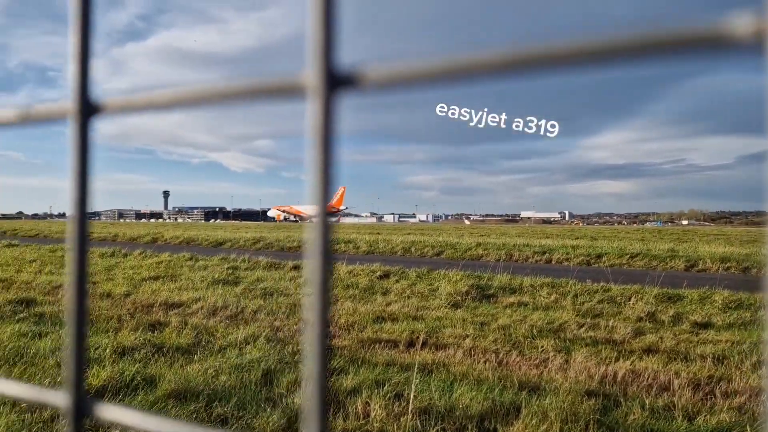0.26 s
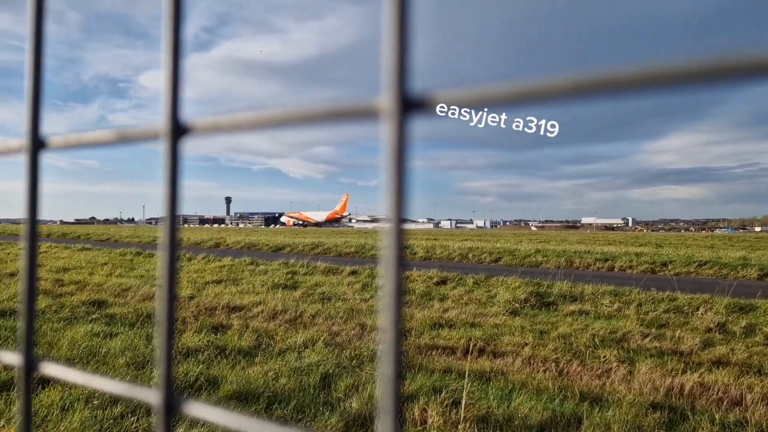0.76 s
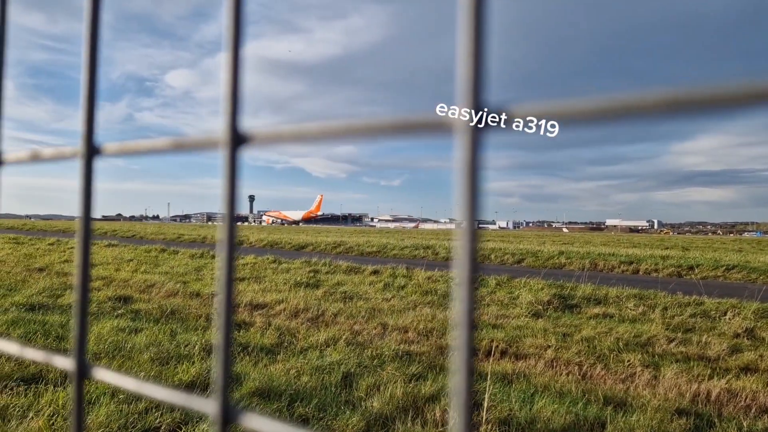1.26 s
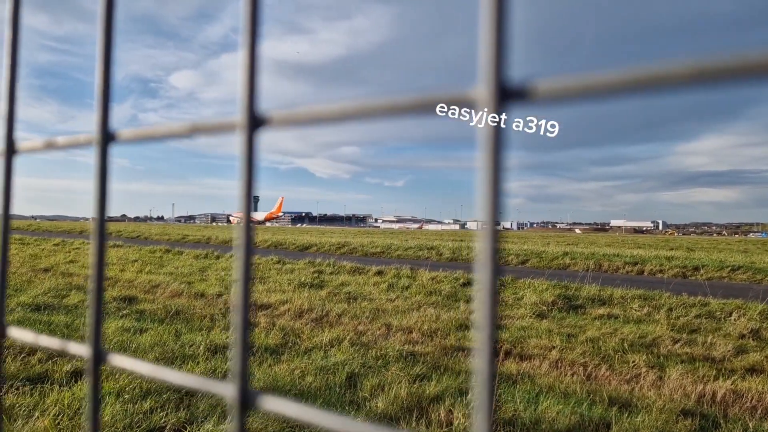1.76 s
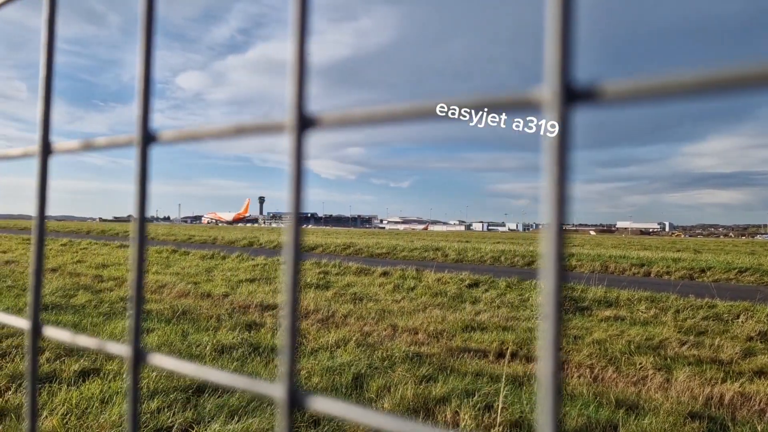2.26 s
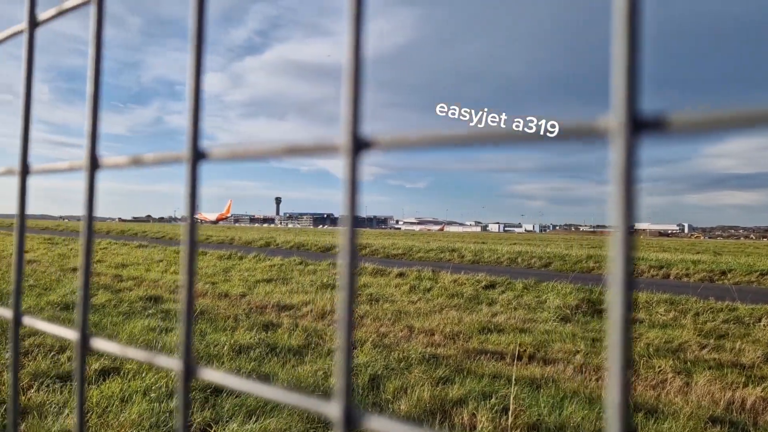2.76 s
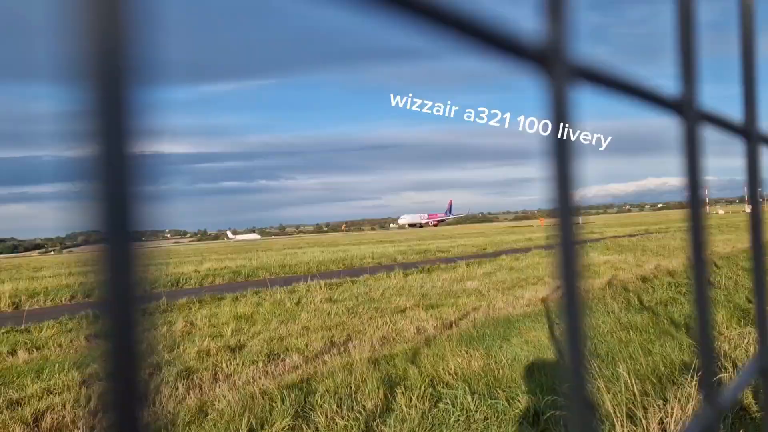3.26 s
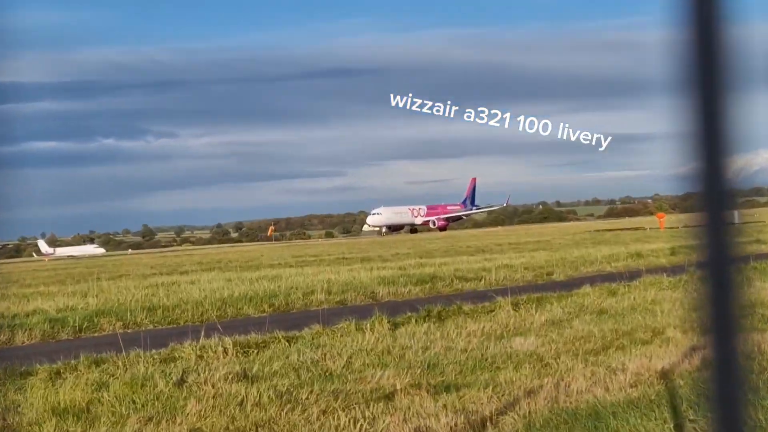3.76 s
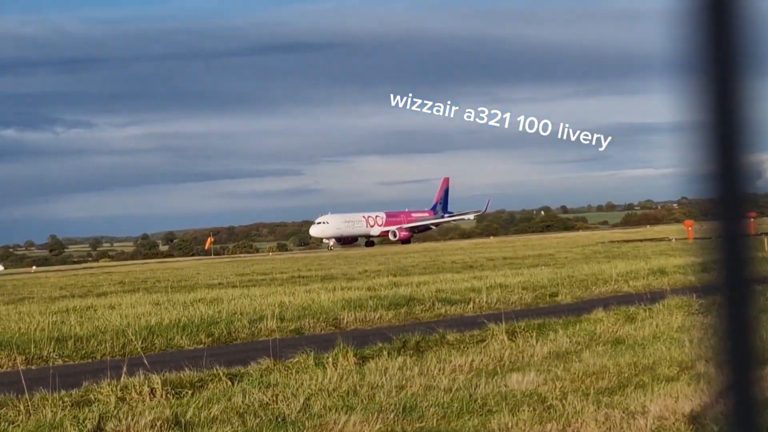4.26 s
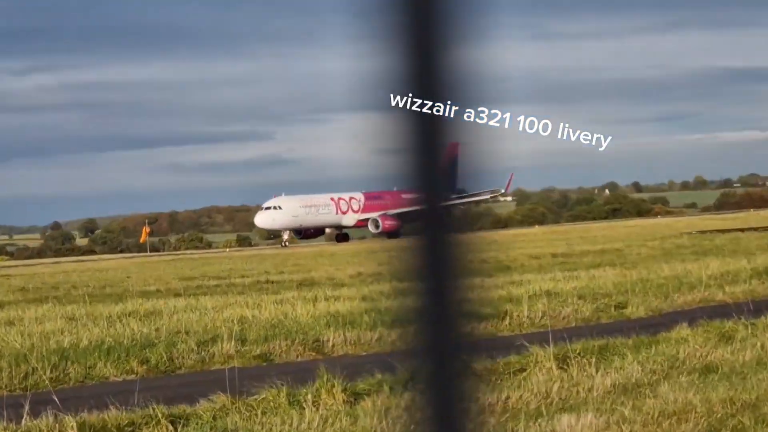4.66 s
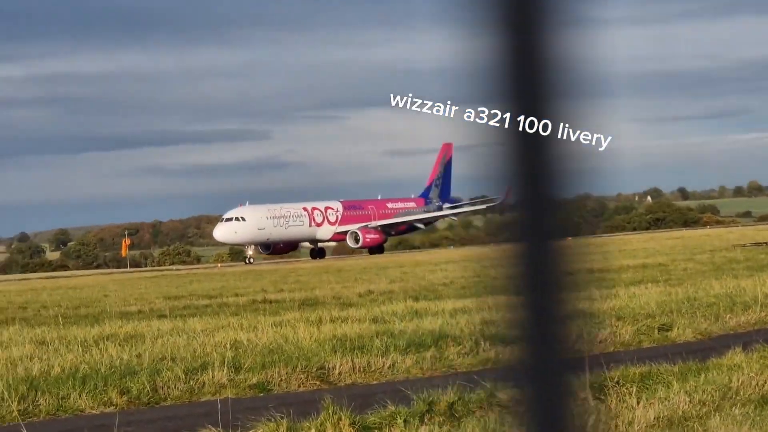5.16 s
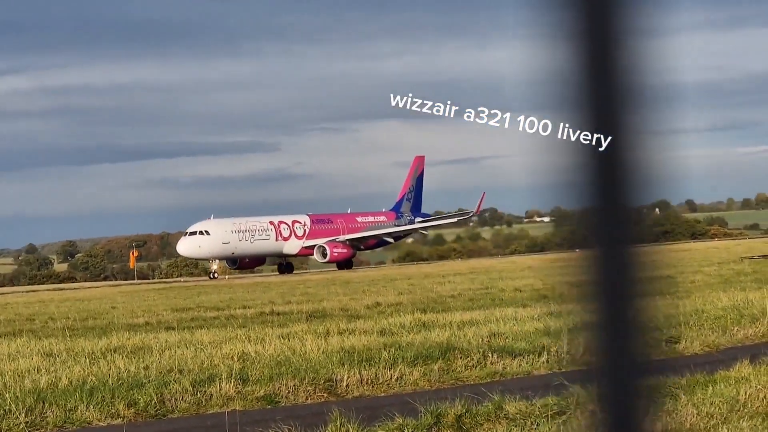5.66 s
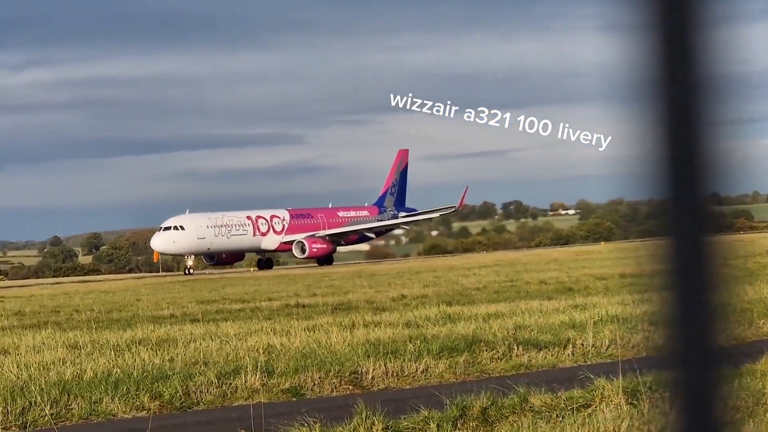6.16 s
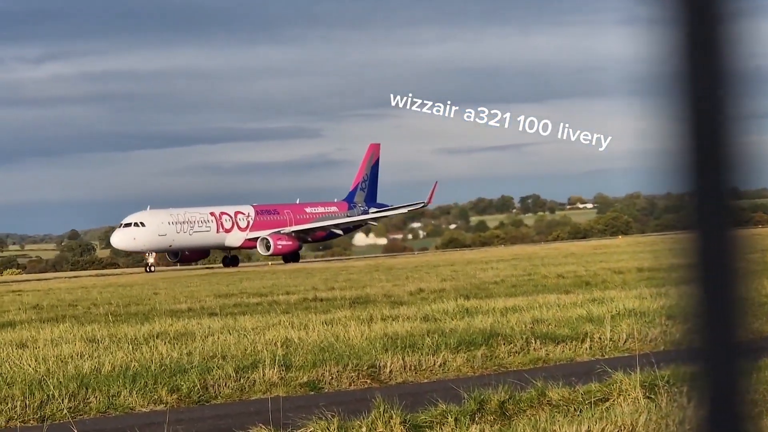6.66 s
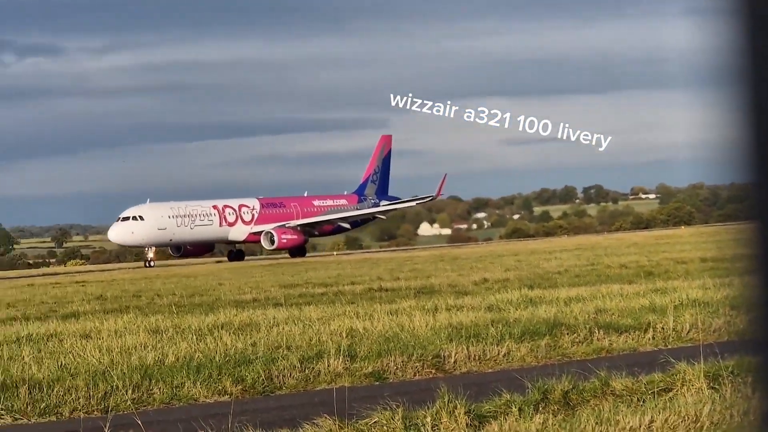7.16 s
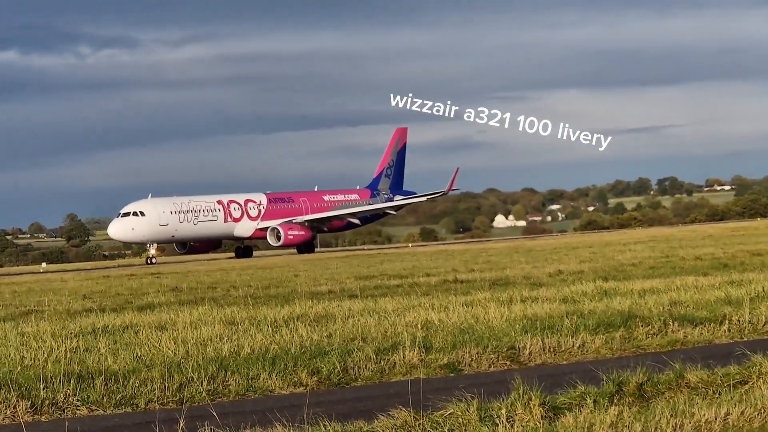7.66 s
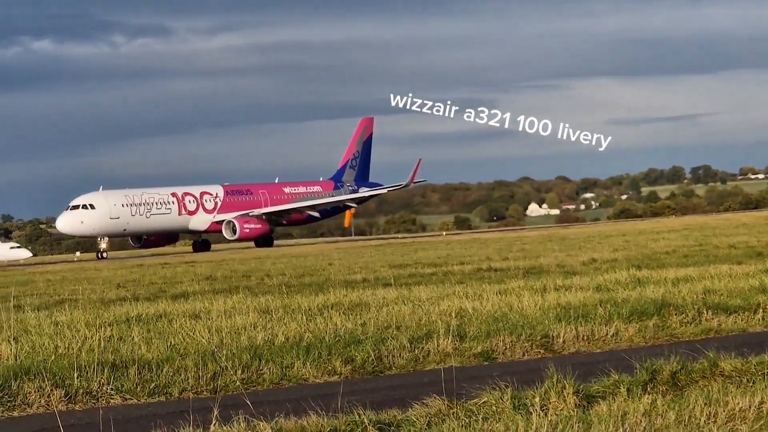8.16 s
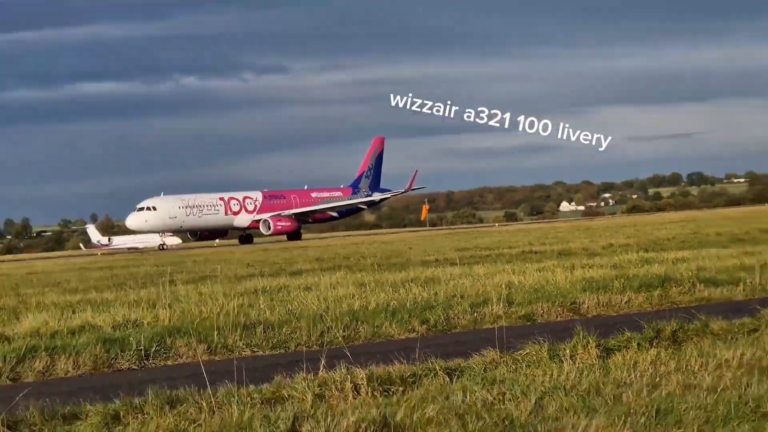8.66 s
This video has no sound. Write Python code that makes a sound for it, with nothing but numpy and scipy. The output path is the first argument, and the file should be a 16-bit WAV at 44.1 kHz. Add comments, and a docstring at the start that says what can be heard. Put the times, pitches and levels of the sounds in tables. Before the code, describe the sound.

Outdoors beside a runway, a distant airliner gives a deep rumble with a soft rushing roar and a faint high whine, dulling as it draws away. After a split second of silence, a nearer airliner takes over, much louder, with heavy rumble, a slightly hollow roar and a wavering whine that creeps up in pitch. One sharp click sounds close to the handheld phone microphone.

```python
"""Two airliners on a runway.

A distant airliner draws away; after a brief silence the scene changes, and a nearer one spools up and drives
the limiter of a handheld phone with two microphone ports. Large exhaust eddies give a deep rumble, turbulent
mixing a broad roar that flickers in the moving air, and the fan blades wavering tones. The hand cupped round
the phone colours the roar, and a few small ticks sound close by."""
import sys
import numpy as np
from scipy import signal
from scipy.fft import rfft, irfft, next_fast_len
from scipy.io import wavfile
from scipy.ndimage import uniform_filter1d, minimum_filter1d, map_coordinates

SR = 44100
rng = np.random.default_rng(int(sys.argv[2]) if len(sys.argv) > 2 else 0)


def put_to_file(sound):
    """Save the sound as 16-bit audio at rate SR, in the file named by the first command-line argument."""
    columns = np.atleast_2d(sound).T  # one column per channel
    safe = np.clip(columns, -1, 1)
    whole_steps = np.round(safe * 32767)
    wavfile.write(sys.argv[1], SR, whole_steps.astype(np.int16))


N = 392049
GAP_START_S, GAP_END_S = 3.2982, 3.3315   # silence where the scene changes from the far airliner to the near one

# Levels of the exhaust. Each row: time in seconds, then low rumble, upper rumble, roar and the roar's
# treble lift, all in dB.
NEAR_LEVELS = [(3.33, -8, -29.5, -28.5, 0.16), (3.7, -9.5, -24, -25.5, 0), (4.6, -4.5, -25, -26, 0.42),
               (5.5, -6, -21.5, -25, -1.5), (6.2, -5.5, -21, -25, -1.3), (6.6, -4.5, -26, -28, 0.17),
               (7.6, -7, -22, -26.5, -0.42), (8.75, -6.5, -26.5, -27.5, 0.13), (8.84, -16.5, -26, -31.5, 0),
               (8.89, -14, -20.5, -28.5, 0)]
# Rumble spectrum. Each row: frequency in Hz, relative density in dB.
NEAR_RUMBLE_SPECTRUM = [(12, -48), (20, -30.5), (59, -1.5), (92, 0), (147, -1), (217, -9.5), (390, -37),
                        (450, -46), (580, -65.5), (990, -120)]
# Roar spectra, left port then right. Each row: frequency in Hz, relative density in dB.
NEAR_ROAR_SPECTRA = [(430, -3), (780, -1.7), (860, -6.5), (1080, 1), (1340, -2.5), (1640, -1.5),
                     (2710, -10), (2970, -4), (5510, -13.5), (5640, -17), (7020, -25.5), (7880, -25),
                     (8660, -53.5), (8790, -52.5)], [(430, -6.5), (600, -6.5), (780, 2.5), (1080, -4.5),
                     (1290, -1), (1420, 2), (1590, 2.5), (3490, -6), (5510, -11.5), (5940, -23),
                     (6240, -15.5), (6930, -21), (7490, -21), (8790, -58.5)]
# Path difference round the phone. Each row: frequency in Hz, phase lead of the left port in radians.
NEAR_PHASE = [(0, 0), (690, 0.3), (950, 1.5), (1210, 0.9), (1550, 2.7), (1890, 1.9), (2840, 9.4),
              (4130, 12.6), (5080, 19.0), (5860, 20.3), (6120, 19.5), (7060, 25.1), (7580, 26.1),
              (8010, 30.4)]
# Likeness of the roar at the two ports. Each row: frequency in Hz, coherence from 0 to 1.
NEAR_COHERENCE = [(300, .95), (500, .8), (750, .92), (1300, .84), (1700, .6), (2400, .66), (3400, .84),
                  (5000, .72), (6000, .5), (8000, .35)]
# Peaks and dips of the cupped hand, left port then right. Each row: centre in Hz, width in Hz, gain in dB.
NEAR_HAND_MODES = ([(805, 79, 5.5), (1170, 74, 4), (2230, 230, 5.5), (3680, 280, -1.5), (4340, 300, -0.5),
                   (7500, 300, -1.5)], [(800, 110, 1.5), (1340, 320, 5.5), (1590, 130, -13),
                   (2000, 230, -1), (2420, 170, -3.5), (3410, 200, 6), (4450, 250, 0.5), (4860, 220, 4.5),
                   (6440, 250, 3.5), (7640, 250, 3)])
# Blade tones of the two engines, fading in the air. Each row: time in seconds, rms level in dB.
FIRST_FAN_LEVELS = [(3.33, -33), (3.56, -33), (3.6, -28), (3.75, -26), (3.81, -40), (3.92, -30),
                    (4.04, -38), (4.13, -28), (4.3, -29), (4.43, -35), (4.54, -26), (4.66, -42),
                    (5.12, -29), (5.45, -44), (6.08, -33), (6.7, -45), (7.08, -35), (7.25, -44), (7.6, -36),
                    (7.8, -41), (8.15, -35), (8.5, -44), (8.89, -47)]
SECOND_FAN_LEVELS = [(3.33, -43), (3.65, -37), (3.9, -46), (4.25, -38), (4.6, -49), (5.35, -46),
                     (5.48, -29.5), (5.62, -33.5), (5.8, -48.5), (7.3, -44.5), (8.89, -49)]
def near_airliner(t):
    """Spool-up: two engines, a little apart in pitch, approach full speed exponentially."""
    full_speed_hz, rise_hz, spool_s, second_speed_ratio = 1968, 120, 1.8, 0.954
    fan_hz = full_speed_hz - rise_hz * np.exp(-(t - GAP_END_S) / spool_s)
    low_db, upper_db, roar_db, treble_db = in_time(NEAR_LEVELS, t)
    jet = roar(t, NEAR_ROAR_SPECTRA, roar_db, treble_db, NEAR_COHERENCE, NEAR_PHASE,
               gust_db=-0.14, patch_db=0.77, low_hz=330, high_hz=8500)
    return (rumble(t, NEAR_RUMBLE_SPECTRUM, low_db, upper_db, lead_rad=0.31, pan_db=-1, split_hz=218.8)
            + howl(t, cupped_hand(t, jet, NEAR_HAND_MODES))
            + fan(t, fan_hz, FIRST_FAN_LEVELS, lead_rad=1.9, pan_db=-1.5, scatter=0.35, spread_hz=22)
            + fan(t, second_speed_ratio * fan_hz, SECOND_FAN_LEVELS,
                  lead_rad=1.8, pan_db=5.5, scatter=0.94, spread_hz=50))


# Levels of the exhaust. Each row: time in seconds, then low rumble, upper rumble, roar and the roar's
# treble lift, all in dB.
FAR_LEVELS = [(0, -15, -26.5, -38.5, 0.5), (1, -16, -29, -38.5, -0.5), (1.8, -16.5, -35.5, -38.5, -0.5),
              (2.3, -16, -45, -41, -3), (2.7, -16, -44.5, -40, 0.5), (3.3, -15.5, -49, -42.5, -0.5)]
# Spectra of rumble and roar (left port, then right). Each row: frequency in Hz, relative density in dB.
FAR_RUMBLE_SPECTRUM = [(12, -37.5), (20, -23), (49, 0), (103, 2), (145, -3.5), (201, -5.5), (274, -19),
                       (351, -32.5), (450, -45.5), (580, -73.5), (990, -120)]
FAR_ROAR_SPECTRA = [(430, -7), (470, -8.5), (730, -0.8), (950, -6), (1510, -2.1), (1680, -4.5), (2150, -2),
                    (4870, -23), (5600, -12.5), (7670, -19.5), (8010, -22), (9390, -24.5), (10340, -34.5),
                    (10380, -33)], [(430, -5.5), (470, -10.5), (730, -1), (990, -8), (1420, -5), (1720, -7),
                    (3960, -12), (4690, -9.5), (6240, -13.5), (7280, -13), (7880, -17), (8440, -30),
                    (10290, -48), (10380, -50)]
# Path difference round the phone. Each row: frequency in Hz, phase lead of the left port in radians.
FAR_PHASE = [(0, 0), (1810, 0.9), (2840, -0.1), (3190, 0.4), (3620, -0.0), (3880, 0.9), (4130, 0.5),
             (4820, 2.6), (5250, 2.3), (6120, 2.6), (6370, 2.2), (6800, 2.7), (7490, 4.3), (8010, 4.6)]
# Likeness of the roar at the two ports. Each row: frequency in Hz, coherence from 0 to 1.
FAR_COHERENCE = [(300, .95), (500, .84), (750, .92), (1500, .8), (2500, .8), (4000, .62), (6000, .5),
                 (9000, .25)]
# Peaks and dips of the cupped hand, left port then right. Each row: centre in Hz, width in Hz, gain in dB.
FAR_HAND_MODES = [(3900, 300, 2), (7240, 200, -7)], [(1900, 200, -2.5), (2550, 180, -16), (3600, 400, -8.5),
                  (7150, 500, 8)]
# Blade tone, fading in the air. Each row: time in seconds, rms level in dB.
FAR_FAN_LEVELS = [(0, -62), (.5, -52), (.85, -47.5), (1.3, -60), (1.45, -60), (1.7, -47), (2.1, -56),
                  (2.3, -67), (2.75, -53), (3.3, -67)]
def far_airliner(t):
    """Doppler shift: the blade tone sinks as the aircraft gathers speed away from the listener."""
    start_hz, sag_hz_per_s = 2365, 36
    fan_hz = start_hz - sag_hz_per_s * t
    low_db, upper_db, roar_db, treble_db = in_time(FAR_LEVELS, t)
    jet = roar(t, FAR_ROAR_SPECTRA, roar_db, treble_db, FAR_COHERENCE, FAR_PHASE,
               gust_db=0.23, patch_db=0.63, low_hz=328, high_hz=10300)
    return (rumble(t, FAR_RUMBLE_SPECTRUM, low_db, upper_db, lead_rad=0.12, pan_db=0.7, split_hz=183.3)
            + cupped_hand(t, jet, FAR_HAND_MODES)
            + fan(t, fan_hz, FAR_FAN_LEVELS, lead_rad=0.4, pan_db=6, scatter=0.6, spread_hz=25))


# Likeness of the rumble at the two ports. Each row: frequency in Hz, coherence from 0 to 1.
RUMBLE_COHERENCE = [(25, 0.93), (60, 0.99), (125, 1), (250, 1), (450, 0.65)]
def rumble(t, spectrum, low_db, upper_db, lead_rad, pan_db, split_hz):
    """Large exhaust eddies radiate low noise; its upper edge comes and goes with ground and angle."""
    size = next_fast_len(len(t))
    hz, white = port_noise(size, RUMBLE_COHERENCE, [(20, 0.01), (400, lead_rad)])
    shaped = white * amp(at_hz(spectrum, hz))
    highpass = 1 / (1 + (split_hz / (hz + 1)) ** 8)
    low = irfft(shaped * (1 - highpass), size)[:, :len(t)]
    upper = irfft(shaped * highpass, size)[:, :len(t)]
    return amp(low_db) * rms_one(low) + amp(upper_db) * pan(pan_db) * rms_one(upper)


def roar(t, spectra, level_db, treble_db, coherence, phase, gust_db, patch_db, low_hz, high_hz):
    """Scintillation: turbulence on the way makes bands of jet mixing noise flicker, together and alone."""
    size = next_fast_len(len(t))
    hz, white = port_noise(size, coherence, phase)
    colour_db = [at_hz(port, hz) for port in spectra]
    shaped = white * amp(colour_db) / (1 + (low_hz / (hz + 1)) ** 4) * (hz < high_hz)
    rms = np.sqrt(np.mean(irfft(shaped, size) ** 2))
    half_octaves = np.clip(2 * np.log2((hz + 1) / 500), 0, 8)   # band centres from 500 Hz to 8 kHz
    gust, patch_below = drift(14, len(t)), drift(7.6, len(t))
    out = 0
    for k in range(9):
        band = irfft(shaped * np.clip(1 - abs(half_octaves - k), 0, 1), size)[:, :len(t)]
        patch = drift(6.4, len(t))
        flicker_db = gust_db * gust + patch_db * (patch + patch_below)
        treble_share = np.clip((k - 4) / 2, 0, 1)   # air and angle act on the treble first
        out = out + band * amp(level_db + treble_share * treble_db + flicker_db)
        patch_below = patch
    return out / rms


def fan(t, hz, levels, lead_rad, pan_db, scatter, spread_hz):
    """Interference: the direct blade-passing tone meets a randomly scattered part, and so wavers."""
    level_db, = in_time(levels, t)
    path = 1 + scatter * (drift(spread_hz, len(t)) + 1j * drift(spread_hz, len(t)))
    wave = path / np.sqrt(1 + 2 * scatter ** 2) * np.exp(2j * np.pi * np.cumsum(hz) / SR)
    ports = np.real([wave, wave * np.exp(-1j * lead_rad)])
    return np.sqrt(2) * amp(level_db) * pan(pan_db) * ports


# Swell of the near roar's lowest peak. Each row: time in seconds, gain in dB.
HOWL_GAIN = [(3.33, -1), (4.8, 0), (5.3, -1), (6.3, 3), (6.8, 0.5), (8.3, 0.5), (8.89, 1.5)]
def howl(t, ports, centre_hz=770, half_width_hz=160):
    """Band emphasis: one hollow band of the roar rises and falls on its own."""
    edges = [centre_hz - half_width_hz, centre_hz + half_width_hz]
    band = signal.sosfiltfilt(signal.butter(1, edges, "band", fs=SR, output="sos"), ports)
    gain_db, = in_time(HOWL_GAIN, t)
    return ports + (amp(gain_db) - 1) * band


# The hand turning the phone. Each row: time in seconds, right port delay in ms, cupping from 0 to 1.
HAND_MOTION = [(0, 0, 1), (3.3, 0.0058, 0), (3.33, -0.023, 1), (5.5, 0.0058, 0.9), (8.89, 0.0076, 0)]
def cupped_hand(t, ports, modes):
    """Cavity resonance: echoes in the hand add peaks and dips, the stronger the closer it cups."""
    size = next_fast_len(len(t))
    hz = np.arange(size // 2 + 1) * SR / size
    gain_db = [sum(db * np.exp(-((hz - centre) / width) ** 2) for centre, width, db in port)
               for port in modes]
    coloured = irfft(rfft(ports, size) * amp(gain_db), size)[:, :len(t)]
    _, cupping = in_time(HAND_MOTION, t)
    return (1 - cupping) * ports + cupping * coloured


def turning_phone(t, ports):
    """Path difference: turning the phone shifts the time of arrival at the right port."""
    left, right = ports
    delay_ms, _ = in_time(HAND_MOTION, t)
    return np.array([left, map_coordinates(right, [(t - delay_ms / 1000) * SR], order=3, mode="nearest")])


# Ticks at the phone. Each row: start in seconds, peak in dB, pitch in Hz, width in Hz, pan in dB.
PHONE_TICKS = [(.984, -34, 480, 200, 0), (3.1192, -37, 6500, 2560, -8), (6.158, -29, 11800, 1800, 3),
               (6.158, -15, 900, 6000, -1), (6.1635, -41, 12000, 4000, -1), (8.407, -36, 7480, 900, -1.5),
               (8.541, -37, 7260, 900, -10)]
def ticks(length=512):
    """Damped oscillation: each tick is one short ring, the briefer the wider its band."""
    out, t = np.zeros((2, N)), np.arange(length) / SR
    for start_s, peak_db, hz, width_hz, pan_db in PHONE_TICKS:
        start = round(start_s * SR)
        envelope = (2 * width_hz * t * np.exp(1 - 2 * width_hz * t)) ** 2
        out[:, start:start + length] += amp(peak_db) * pan(pan_db) * envelope * np.cos(2 * np.pi * hz * t)
    return out


def port_noise(size, coherence, phase):
    """Partial coherence: each port's noise spectrum is a shared wave plus scattered sound of its own."""
    hz = np.arange(size // 2 + 1) * SR / size
    shared, left, right = rfft(rng.standard_normal((3, size)))
    share = np.clip(at_hz(coherence, hz), 0, 1)
    lag = np.exp(-1j * np.interp(hz, *np.transpose(phase)))
    direct = np.array([shared, shared * lag])
    return hz, np.sqrt(share) * direct + np.sqrt(1 - share) * np.array([left, right])


def drift(rate_hz, size, step=32, settle=2000):
    """Slow random motion of unit rms: coarse noise through two one-pole low-passes."""
    pole = np.exp(-2 * np.pi * rate_hz * step / SR)
    noise = rng.standard_normal(size // step + settle + 2)
    slow = signal.lfilter([1], [1, -2 * pole, pole * pole], noise)[settle:]
    return np.interp(np.arange(size) / step, np.arange(len(slow)), rms_one(slow))


def amp(db):
    """Decibels as an amplitude ratio."""
    return 10 ** (np.asarray(db) / 20)


def pan(db):
    """Port gains for a level difference, left minus right."""
    return amp([[db / 2], [-db / 2]])


def rms_one(x):
    """Normalisation to unit rms."""
    return x / np.sqrt(np.mean(x ** 2) + 1e-20)


def in_time(rows, t):
    """Linear interpolation of each column at the times t."""
    times, *columns = np.transpose(rows)
    return [np.interp(t, times, column) for column in columns]


def at_hz(rows, hz):
    """Interpolation on a logarithmic frequency axis."""
    frequencies, values = np.transpose(rows)
    return np.interp(np.log(hz + 1), np.log(frequencies + 1), values)


def scene():
    """Superposition at the ports: the far airliner, then the near one, with the ticks on top."""
    t = np.arange(N) / SR
    change = round((GAP_START_S + GAP_END_S) / 2 * SR)
    airliners = np.hstack([far_airliner(t[:change]), near_airliner(t[change:])])
    return turning_phone(t, airliners) + ticks()


def record(dry):
    """Look-ahead limiting of both ports together, followed by the silent gap and a steep low-pass."""
    limit_db, attack_s, release_db_per_s, cutoff_hz = -0.25, 0.0031, 230, 15500
    t, span = np.arange(N) / SR, round(attack_s * SR)
    over_db = np.maximum(20 * np.log10(abs(dry).max(axis=0) + 1e-9) - limit_db, 0)
    held_db = np.maximum.accumulate(over_db + release_db_per_s * t) - release_db_per_s * t
    reduction_db = uniform_filter1d(-minimum_filter1d(-held_db, span), span)
    audible = (t < GAP_START_S) | (t > GAP_END_S)
    lowpass = signal.cheby2(12, 70, cutoff_hz, fs=SR, output="sos")
    return np.clip(signal.sosfilt(lowpass, dry * amp(-reduction_db) * audible), -1, 1)


dry = scene()
out = record(dry)
put_to_file(out)
```